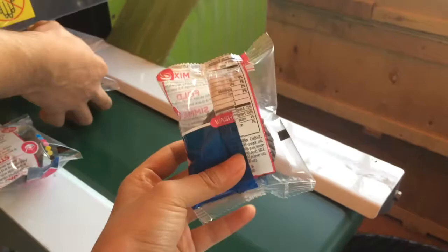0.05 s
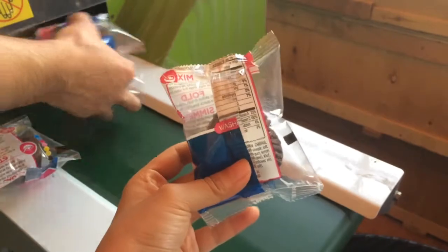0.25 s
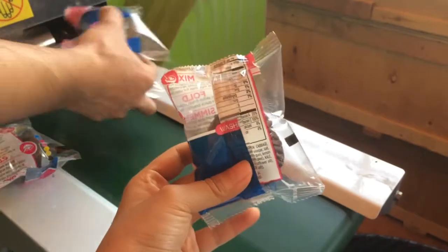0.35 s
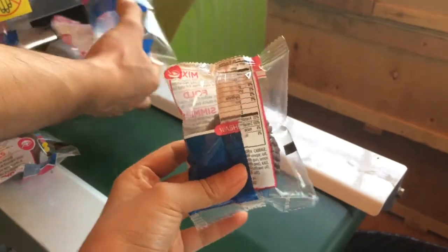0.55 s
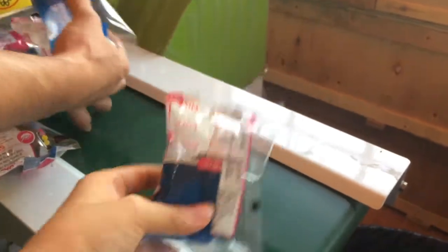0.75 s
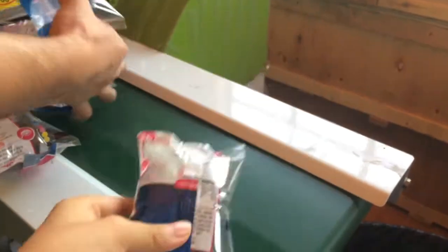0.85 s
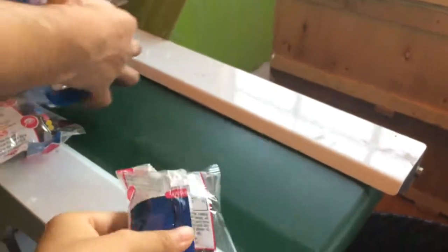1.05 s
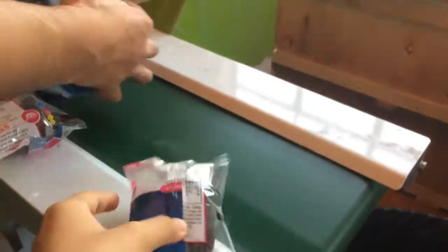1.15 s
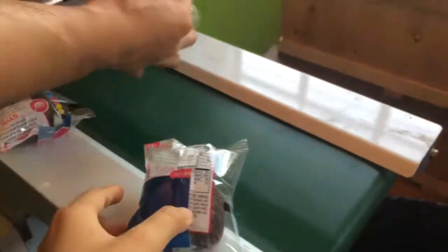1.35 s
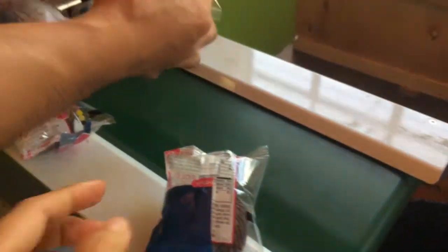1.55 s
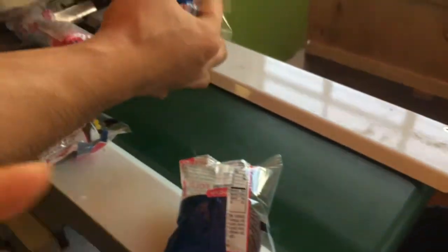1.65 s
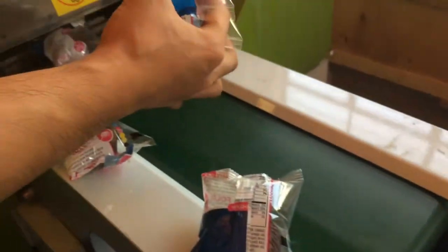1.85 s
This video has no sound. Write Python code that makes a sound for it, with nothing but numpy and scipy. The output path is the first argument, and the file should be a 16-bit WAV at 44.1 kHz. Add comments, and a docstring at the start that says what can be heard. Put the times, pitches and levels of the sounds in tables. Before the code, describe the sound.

Sharp bursts of compressed air from a packing machine, once a second, over steady factory machinery noise

```python
"""A packing machine in a factory, close to the microphone, cycling once a second over steady machinery noise.
First the drive rumbles, film slides over rollers, packets rustle and tick, and film squeaks faintly.
Then a valve lets off air: a pop and a chirp climbing through cavity resonances, then a bright, whistling hiss.
A low drone swells, and the stroke and the air burst come round again. Shaped noise makes every source;
the air, packets and squeaks also reflect from the surroundings. Both channels are alike."""
import sys
import numpy as np
from scipy import signal
from scipy.fft import rfft, irfft
from scipy.io import wavfile

SR = 44100
rng = np.random.default_rng(int(sys.argv[2]) if len(sys.argv) > 2 else 0)


def int16_out(signal):
    """Quantize to a 16-bit WAV file."""
    q = np.round(np.clip(np.atleast_2d(signal).T, -1, 1) * 32767)
    wavfile.write(sys.argv[1], SR, q.astype(np.int16))


N = 83790
T = np.arange(N) / SR  # time [s]

# All spectra: (frequency [Hz], relative level [dB]); only their shape counts.

# Factory background: steady wash
FLOOR_SPECTRUM = [(25, -40), (50, -19), (140, -14.5), (250, -9.5), (400, -14), (650, -19), (950, -13),
                  (1400, -15), (3000, -13.5), (5000, -19), (7000, -20.5), (13000, -30), (15500, -36)]
FLOOR_DB = -40.5
# machine hum: (frequency [Hz], width [Hz], level [dB])
HUM = [(242, 5.3, -59), (361, 5.7, -55)]
# low drone, swelling once a cycle: (time of the top [s], level [dB])
DRONES = [(.825, -44.5), (1.88, -45)]
DRONE_HZ, DRONE_WIDTH_HZ, DRONE_S = 170, 15, 0.073

# Drive strokes: (time of top speed [s], shake level [dB], film level [dB])
STROKES = [(.16, -30, -34.5), (1.163, -29.5, -36)]
SPEED_UP_S, SLOW_DOWN_S = 0.21, 0.23
# broad rumble of the drive, its level relative to the stroke's shake
RUMBLE_SPECTRUM = [(25, -35), (50, -8), (100, -6), (200, 1.5), (400, -1.5), (650, -7.5), (1500, -17),
                   (4000, -62)]
RUMBLE_DB = -6
# frame resonances: (frequency [Hz], width [Hz], level relative to the shake [dB])
FRAME = [(122, 11.6, -16.5), (176.8, 20, -7.5), (244.4, 10, -2), (272, 19, -14), (361, 8.6, -8.5),
         (438, 21, -14), (1060, 4.7, -16)]
# rollers: spectrum, then (time [s], level [dB])
ROLLER_SPECTRUM = [(200, -12), (450, 0), (800, -0.5), (1050, -1.5), (1700, -2.5), (2600, -11.5),
                   (5000, -23), (15000, -28)]
ROLLER_LEVEL = [(0, -43), (.12, -38), (.25, -33.5), (.31, -35), (.41, -29.5), (.47, -46), (.65, -68),
                (.9, -47.5), (1.03, -40), (1.13, -34), (1.24, -34), (1.36, -37.5), (1.42, -29), (1.48, -38),
                (1.65, -59), (1.9, -46.5)]
UNEVEN_DB, UNEVEN_S = 1.02, 0.019  # rms and time scale of the level's wavering
# wrapping film pulled forward, starting ahead of top speed
FILM_SPECTRUM = [(200, -57), (900, -1), (2000, 7), (3400, 4.5), (6500, -3.5), (10000, -13.5), (15000, -34)]
FILM_LEAD_S, FILM_RISE_S, FILM_FADE_S = 0.26, 0.016, 0.23
# dull bumps in the machine: (start [s], level [dB]), then their spectrum
BUMPS = [(0.223, -30.5), (0.383, -27.5), (.93, -37), (1.01, -33), (1.391, -30), (1.506, -34.5)]
BUMP_SPECTRUM = [(25, -42), (50, -20), (90, -8), (170, 1), (260, -0.5), (420, 4.5), (800, -29), (3000, -53)]
BUMP_RISE_S, BUMP_FADE_S = 0.0091, 0.04

# Squeaks of sliding film: (start [s], length [s], pitch [Hz], level [dB], octave relative to the note [dB])
SQUEAKS = [(0.385, .03, 4050, -40, -25), (1.194, 0.11, 6370, -47, -7)]
SQUEAK_WIDTH_HZ, SQUEAK_ARCH_HZ = 78, 228

# Packet rustles: (start [s], length [s], level [dB]), then their spectrum
RUSTLES = [(0.216, 0.053, -30), (1.083, .19, -54)]
RUSTLE_SPECTRUM = [(200, 7), (800, 0.5), (1900, 4.5), (3000, -3), (4200, -1.5), (8000, -8.5), (15000, -17)]
GRAINS_PER_S, GRAIN_SPREAD_DB, RUSTLE_FADE_S = 4000, 2.5, 0.081
# single creases snapping: (start [s], level [dB]), then their spectrum
TICKS = [(0.0336, -35), (0.0993, -30), (.129, -29.5), (0.3075, -26.5), (0.373, -30), (1.0885, -32),
         (1.1012, -27), (1.1852, -28), (1.264, -35)]
TICK_SPECTRUM = [(500, -10), (3000, 3.5), (7000, -4.5), (14500, -5)]
TICK_FADE_S = 0.0021

# Air bursts: (start [s], length [s], hiss level [dB], chirp level [dB], chirp length [s],
# hiss tilt [dB per octave])
BURSTS = [(0.4275, 0.19, -14.5, -21.5, 0.043, 0.23), (1.4282, 0.2, -13.5, -22, 0.05, -0.1)]
# resonances of the jet: (start [s], length [s], frequency [Hz], width [Hz], level [dB])
WHISTLES = [(.528, 0.079, 3130, 130, -22), (0.515, .042, 5950, 88, -21), (.543, 0.067, 6620, 260, -20.5),
            (.57, 0.034, 7300, 160, -25), (0.48, 0.13, 13000, 230, -30), (0.48, 0.061, 16000, 1700, -24.5),
            (1.49, 0.133, 3750, 560, -24), (1.55, 0.056, 4300, 120, -29.5), (1.49, 0.118, 5680, 350, -22.5),
            (1.52, 0.094, 6950, 270, -22), (1.49, 0.123, 2300, 460, -29.5)]
WHISTLE_RISE_S = 0.0077  # also the fade
WHISTLE_ROOM = 0.49  # share of the whistling sent through the room
# first slug of air
POP_SPECTRUM = [(100, -45), (500, -32), (700, -22), (850, -6), (1020, 5), (1200, -7), (1800, -18),
                (6000, -62)]
POP_DB, POP_DELAY_S, POP_S = -14, 0.0036, 0.0018
# exhaust cavity: (frequency [Hz], width [Hz], level relative to the chirp [dB])
CAVITY = [(776, 38, -4.5), (985, 57, 1), (1325, 87, -3.5), (1665, 75, -1), (2073, 32, -3.5),
          (2247, 113, 3.5), (2705, 200, 0.5)]
CHIRP_FROM_HZ, CHIRP_HZ_PER_S, CHIRP_WIDTH_HZ = 950, 26400, 1200
CHIRP_DELAY_S, CHIRP_FADE_S = 0.0044, 0.0072
# spitting of the barely open valve
SPIT_SPECTRUM = [(100, -42), (600, -16), (2000, 0), (3600, 0.5), (5000, 1), (7000, -3), (15000, -14.5)]
SPIT_DB, SPIT_S, SPIT_FADE_S = -19.5, 0.045, 0.034
# jet noise before tilting
HISS_SPECTRUM = [(40, -43), (110, -25), (180, -15.5), (380, -9.5), (850, -4), (1350, -8), (1700, -3),
                 (2700, -4), (4600, -4.5), (6500, -2.5), (9000, -3), (14500, -6.5), (15500, -14)]
CRACK_DB = -7  # flow of the cracked valve, relative to full flow
OPEN_AT_S, OPEN_S, CLOSE_S = 0.052, 0.0053, 0.0049  # delay to full opening, its width, closing fade

# Decay of the far tail: (frequency [Hz], time to fall 60 dB [s])
ROOM_T60 = [(100, 0.23), (1000, 0.43), (3000, 1), (7000, 0.77), (15000, 0.29)]
ROOM_DB, NEAR_DB, NEAR_T60_S = -22, -9.5, 0.14  # reflections relative to the direct sound
EDGE_HZ = 15450  # recorder's upper band limit


def amp(db):
    """Decibels to gain."""
    return 10 ** (np.asarray(db) / 20)


def unit(x):
    """Scales to rms 1."""
    return x / np.sqrt(np.mean(x ** 2) + 1e-20)


def read(points, hz):
    """Reads a table on a log-frequency axis."""
    f, value = np.transpose(points)
    return np.interp(np.log(hz + 1), np.log(f + 1), value)


def colour(x, spectrum):
    """Filters x by a spectrum, then sets rms 1."""
    gain = amp(read(spectrum, np.fft.rfftfreq(N, 1 / SR)))
    return unit(irfft(rfft(x) * gain, N))


def noise(spectrum):
    """Steady noise with a spectrum, at rms 1."""
    return colour(rng.standard_normal(N), spectrum)


def ringing(hz, width):
    """Noise in one steep resonance: a fuzzy tone of rms 1, at a fixed or moving frequency."""
    offset = np.fft.fftfreq(N, 1 / SR)
    slow = np.fft.ifft(np.fft.fft(rng.standard_normal(N)) / (1 + (offset / width) ** 2))
    slow /= np.sqrt(abs(slow) + 1e-12)  # evens out the tone's swelling
    phase = 2 * np.pi * np.cumsum(hz * np.ones(N)) / SR
    return unit((slow * np.exp(1j * phase)).real)


def gate(start, length, rise, fade):
    """Linear attack, hold, exponential release; length includes the attack."""
    return np.clip((T - start) / rise, 0, 1) * np.exp(-np.maximum(T - start - length, 0) / fade)


def step(at, width):
    """Smooth change from 0 to 1."""
    return .5 + .5 * np.tanh((T - at) / width)


def factory():
    """Background: a steady wash of machinery, a wavering hum and a drone that comes and goes."""
    wash = amp(FLOOR_DB) * noise(FLOOR_SPECTRUM)
    hum = sum(amp(db) * ringing(hz, width) for hz, width, db in HUM)
    swell = sum(amp(db) * np.exp(-((T - top) / DRONE_S) ** 2) for top, db in DRONES)
    return wash + hum + swell * ringing(DRONE_HZ, DRONE_WIDTH_HZ)


def drive():
    """Each stroke shakes the frame's resonances and pulls film; rollers and dull bumps sound with it."""
    shake, pull = np.zeros(N), np.zeros(N)
    for top, shake_db, film_db in STROKES:
        width = np.where(T < top, SPEED_UP_S, SLOW_DOWN_S)
        shake += amp(shake_db) * np.exp(-((T - top) / width) ** 2)
        since_pull = T - top + FILM_LEAD_S
        onset = step(top - FILM_LEAD_S, FILM_RISE_S)
        pull += amp(film_db) * onset * np.exp(-(since_pull / FILM_FADE_S) ** 2)
    frame = amp(RUMBLE_DB) * noise(RUMBLE_SPECTRUM)
    frame += sum(amp(db) * ringing(hz, width) for hz, width, db in FRAME)
    rollers = amp(np.interp(T, *np.transpose(ROLLER_LEVEL))) * noise(ROLLER_SPECTRUM)
    slow = noise([(0, 0), (.5 / UNEVEN_S, -3), (5 / UNEVEN_S, -50), (SR / 2, -120)])
    uneven = amp(UNEVEN_DB * slow)
    bumps = sum(amp(db) * gate(s, BUMP_RISE_S, BUMP_RISE_S, BUMP_FADE_S) for s, db in BUMPS)
    return uneven * (shake * frame + rollers) + pull * noise(FILM_SPECTRUM) + bumps * noise(BUMP_SPECTRUM)


def squeaks():
    """Sliding film sings a thin arched note with its octave."""
    out = np.zeros(N)
    for start, length, pitch, db, octave_db in SQUEAKS:
        hz = pitch + SQUEAK_ARCH_HZ * np.sin(np.pi * np.clip((T - start) / length, 0, 1))
        note = ringing(hz, SQUEAK_WIDTH_HZ)
        octave = amp(octave_db) * ringing(2 * hz, 2 * SQUEAK_WIDTH_HZ)
        out += amp(db) * (note + octave) * gate(start, length, 0.0055, .008)
    return out


def packets():
    """Plastic film crackles in dense random grains, with a few separate snaps."""
    sizes = amp(GRAIN_SPREAD_DB * np.minimum(rng.exponential(1, N), 4)) * rng.choice([-1, 1], N)
    grains = sizes * (rng.random(N) < GRAINS_PER_S / SR)
    crackle = colour(grains, RUSTLE_SPECTRUM)
    handling = sum(amp(db) * gate(s, length, 0.0022, RUSTLE_FADE_S) for s, length, db in RUSTLES)
    snaps = sum(amp(db) * gate(s, 0.00056, 0.00035, TICK_FADE_S) for s, db in TICKS)
    return crackle * handling + snaps * noise(TICK_SPECTRUM)


def air_whistles():
    """The jet sings in fuzzy resonant bands, different ones in each burst."""
    out = np.zeros(N)
    for start, length, hz, width, db in WHISTLES:
        out += amp(db) * ringing(hz, width) * gate(start, length, WHISTLE_RISE_S, WHISTLE_RISE_S)
    return out


def air_chirp():
    """A pop, then a band of noise that climbs through the exhaust cavity's resonances."""
    out = np.zeros(N)
    for start, _, _, db, length, _ in BURSTS:
        begin = start + CHIRP_DELAY_S
        centre = CHIRP_FROM_HZ + CHIRP_HZ_PER_S * np.clip(T - begin, 0, length)
        rush = np.zeros(N)
        for hz, width, cavity_db in CAVITY:
            # each resonance is loudest as the band passes it
            nearness = 1 / np.hypot(1, 2 * (hz - centre) / CHIRP_WIDTH_HZ)
            rush += amp(cavity_db) * ringing(hz, width) * nearness
        out += amp(db) * rush * gate(begin, length - CHIRP_DELAY_S, 0.001, CHIRP_FADE_S)
        out += amp(POP_DB) * noise(POP_SPECTRUM) * gate(start + POP_DELAY_S, 2 * POP_S, POP_S, POP_S)
    return out


def air_hiss():
    """The valve spits as it cracks open; then the jet grows to full flow until it is shut off."""
    out = np.zeros(N)
    for start, length, db, _, _, tilt_db in BURSTS:
        jet = noise([(hz, level + tilt_db * np.log2(hz)) for hz, level in HISS_SPECTRUM])
        opening_db = CRACK_DB * (1 - step(start + OPEN_AT_S, OPEN_S))
        flow = amp(db + opening_db) * gate(start, length, .0006, CLOSE_S)
        spit = amp(SPIT_DB) * noise(SPIT_SPECTRUM) * gate(start, SPIT_S, 0.0026, SPIT_FADE_S)
        out += flow * jet + spit
    return out


def room(x):
    """Adds quick sparse reflections from machine and walls, then a fainter tail decaying by frequency."""
    t = T[:SR // 2]
    sparse = rng.standard_normal(len(t)) * (rng.random(len(t)) < .1)
    near = sparse * amp(-60 * t / NEAR_T60_S) * (t > .003)
    hz, at, z = signal.stft(rng.standard_normal(len(t)) * (t > .012), SR, nperseg=256)
    decay = amp(-60 * at / read(ROOM_T60, hz)[:, None])
    far = signal.istft(z * decay, SR, nperseg=256)[1]
    out = x.copy()
    for db, echo in [(NEAR_DB, near), (ROOM_DB, far)]:
        out += amp(db) * signal.fftconvolve(x, echo / np.linalg.norm(echo))[:N]
    return out


def scene():
    """All sources, heard alike in both channels; drive, background and some whistling skip the room."""
    whistles = air_whistles()
    close = packets() + squeaks() + WHISTLE_ROOM * whistles + air_chirp() + air_hiss()
    mono = factory() + drive() + (1 - WHISTLE_ROOM) * whistles + room(close)
    return np.array([mono, mono])


def record(dry):
    """The recorder's band limit: a steep low-pass filter."""
    lowpass = signal.firwin(511, EDGE_HZ, window=("kaiser", 9), fs=SR)
    return signal.oaconvolve(dry, lowpass[None], "same")


dry = scene()
out = record(dry)
int16_out(out)
```